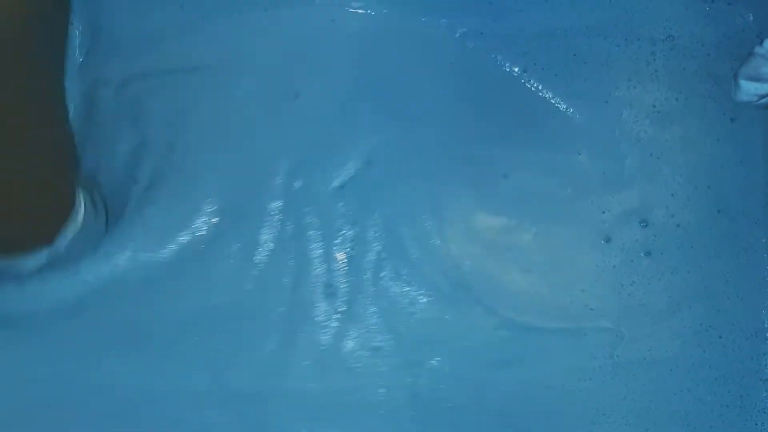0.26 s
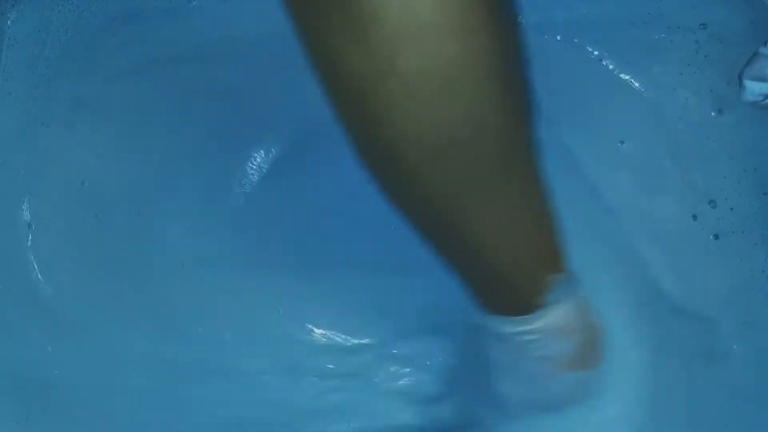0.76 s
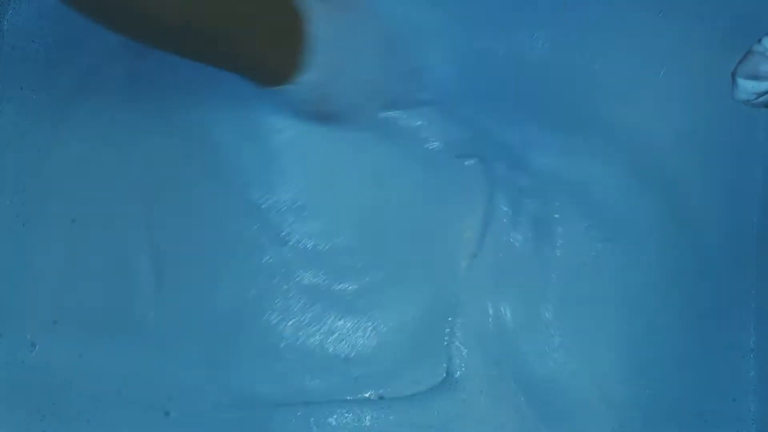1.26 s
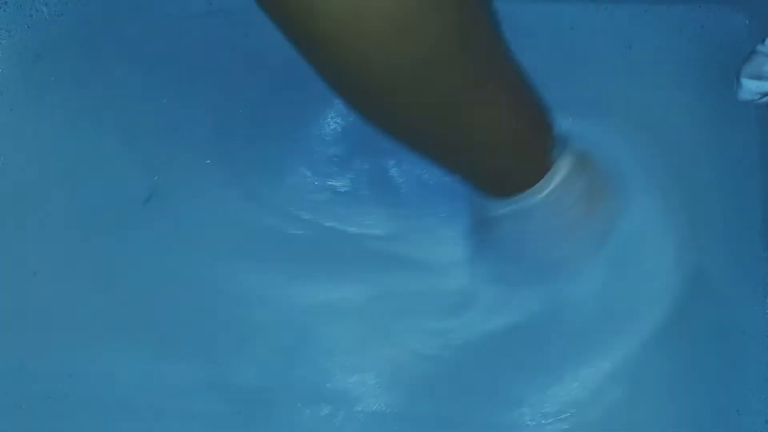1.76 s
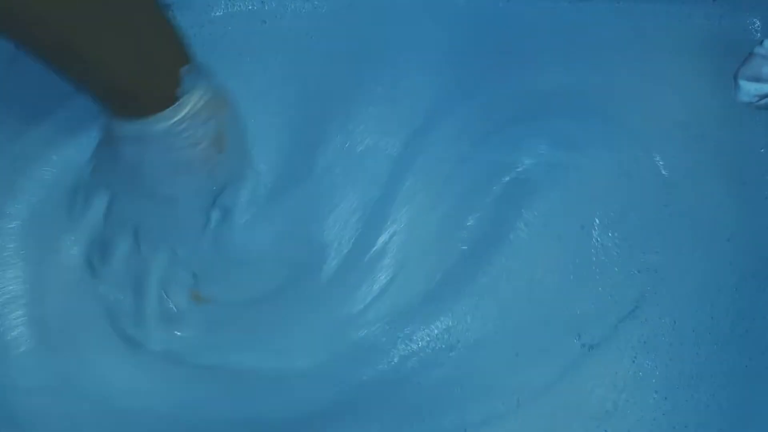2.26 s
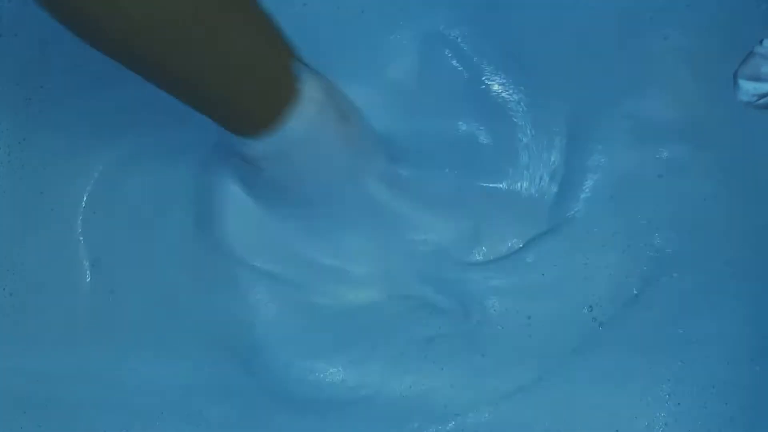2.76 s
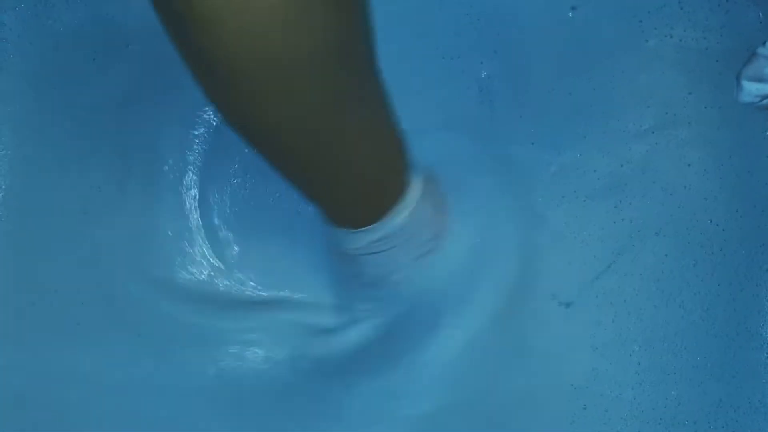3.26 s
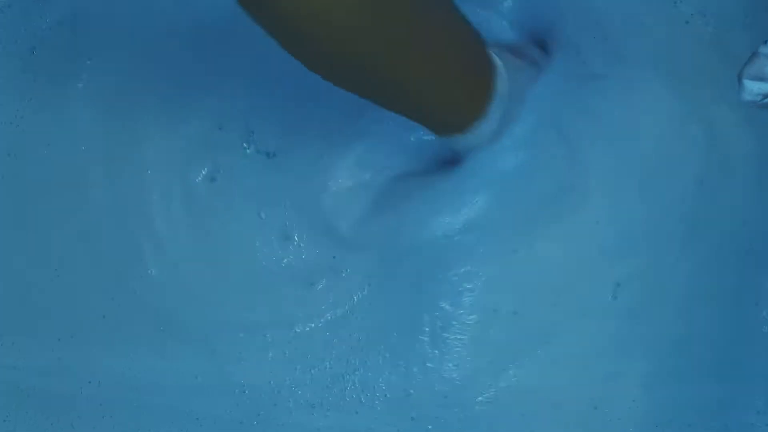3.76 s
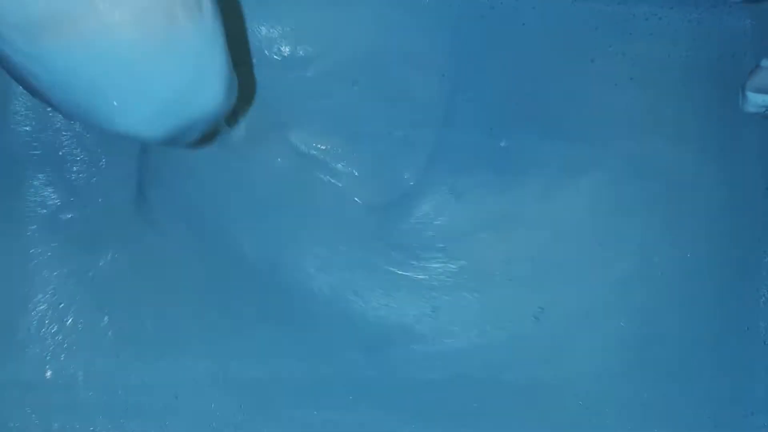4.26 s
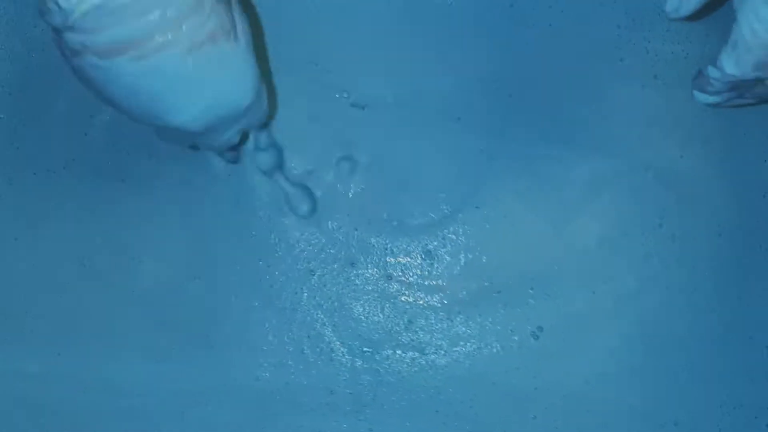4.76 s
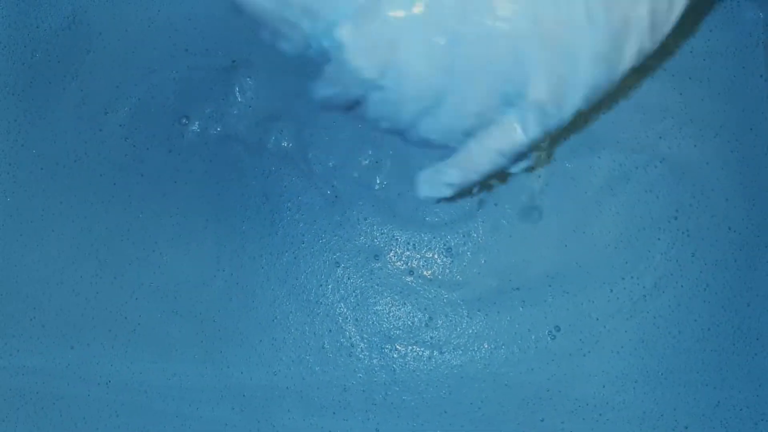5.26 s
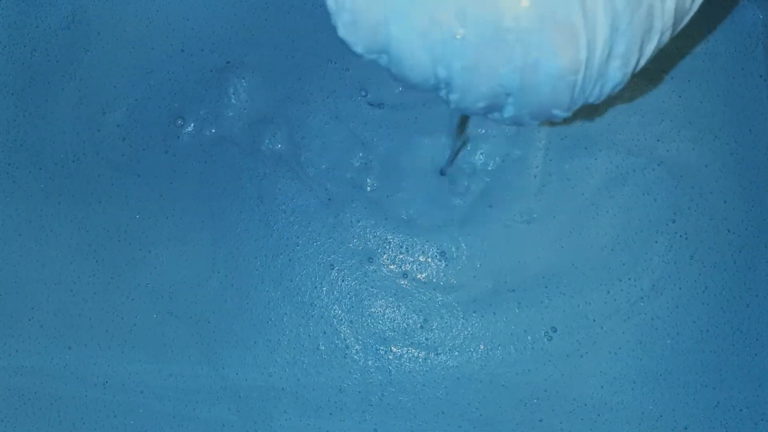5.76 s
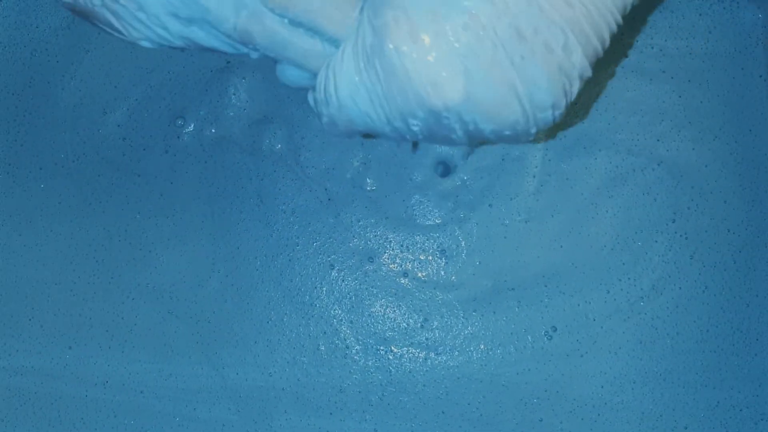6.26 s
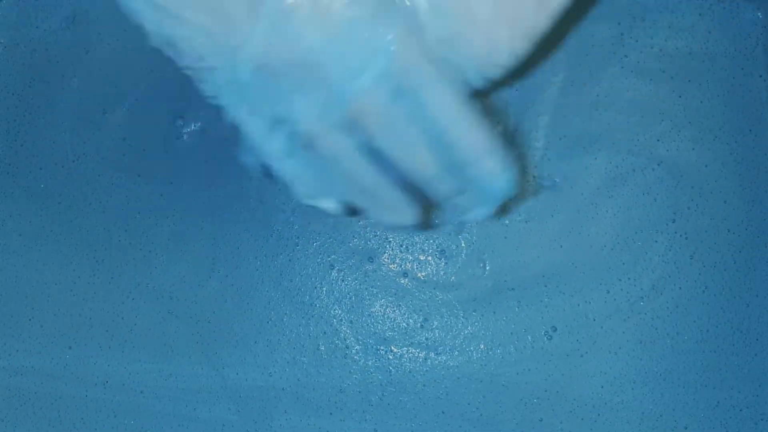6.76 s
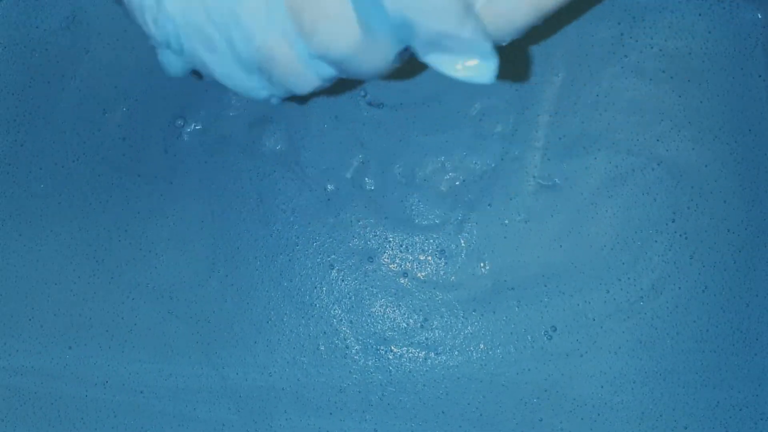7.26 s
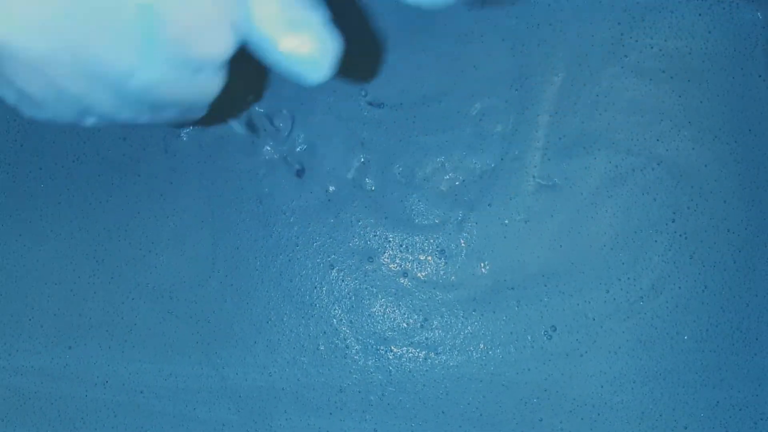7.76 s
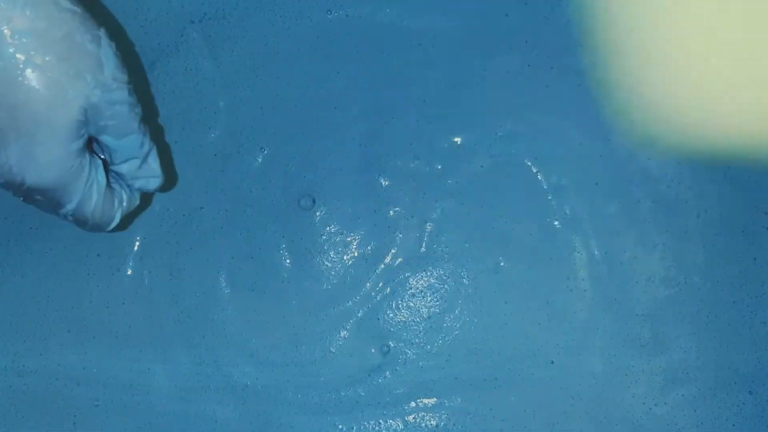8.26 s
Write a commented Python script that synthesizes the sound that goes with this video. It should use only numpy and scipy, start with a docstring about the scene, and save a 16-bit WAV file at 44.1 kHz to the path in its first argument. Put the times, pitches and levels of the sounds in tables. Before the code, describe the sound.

Very close and dry: foam fizzes in uneven strokes, with deep air pockets popping and a loud cluster of plops in the third second. Then wet rubber gloves rub together in bursts of crackly snaps, palm pops, spitting squirts and tiny squeaks. The sounds stop abruptly near eight seconds, leaving faint room hum and one gentle foamy press of a sponge.

```python
"""Foam fizzes at each sweep of a gloved hand through thick soapy paste in a tub, and air pockets plop and
smack. Then two rubber gloves wring and rub the paste with wet snaps and squelches; their sounds break off
abruptly, and after a pause a sponge presses in softly. Foam is filtered random grains and ringing bubbles;
plops and smacks are damped notes whose pitch sinks. Snaps are runs of tiny slips that ring the hollow between
the gloves; squirts and squeaks are bands of noise. One close microphone hears it in a small, quiet room with a
low hum."""
import sys
import numpy as np
from scipy import signal
from scipy.fft import rfft, irfft, next_fast_len
from scipy.io import wavfile

SR = 44100
rng = np.random.default_rng(int(sys.argv[2]) if len(sys.argv) > 2 else 0)


def waveform_to_disk(signal):
    """Save audio, clipped to [-1, 1], as 16-bit WAV at the path in sys.argv[1]."""
    frames = np.transpose(np.atleast_2d(signal))
    scaled = np.clip(frames, -1, 1) * 32767
    samples = np.round(scaled).astype(np.int16)
    wavfile.write(sys.argv[1], SR, samples)


N = 375732  # length in samples

LIFT_S = 4.3  # the stirring hand lifts out of the paste
CUT_S = 8.045  # the glove sounds are cut off abruptly


def from_db(db):
    """Decibels to gain."""
    return 10 ** (np.asarray(db) / 20)


def rms_one(x):
    """Scale to unit power."""
    return x / np.sqrt(np.mean(x ** 2) + 1e-20)


def in_time(rows):
    """Second column of a table, joined by straight lines at every sample."""
    s, values = np.transpose(rows)
    return np.interp(np.arange(N) / SR, s, values)


def add(track, s, sound):
    """Mix a sound in at a time."""
    start = int(np.clip(round(s * SR), 0, N - 1))
    track[start:start + len(sound)] += sound[:N - start]


def colour(x, spectrum):
    """Give a steady sound a spectrum, falling away below its first row; unit power."""
    hz, level_db = np.transpose(spectrum)
    size = next_fast_len(N)
    bins = np.maximum(np.fft.rfftfreq(size, 1 / SR), 1)
    gain = from_db(np.interp(np.log(bins), np.log(hz), level_db))
    gain = gain * np.minimum(bins / hz[0], 1) ** 2
    return rms_one(irfft(rfft(x, size) * gain, size)[:N])


def drift(per_s):
    """A smooth random wander of spread one, with per_s new values each second."""
    knots = rng.standard_normal(8192)
    return rms_one(np.interp(np.arange(N) / SR * per_s, np.arange(len(knots)), knots))


def grains(per_s, spread_db):
    """Tiny clicks at random moments, of random size and sign; unit power."""
    sizes = from_db(spread_db * np.minimum(rng.exponential(1, N), 3.8)) * rng.choice([-1, 1], N)
    return rms_one(sizes * (rng.random(N) < per_s / SR))


def fade(t, t60):
    """Exponential decay, down 60 dB after t60 seconds."""
    return np.exp(-np.log(1000) * t / t60)


def burst(x, level_db):
    """Scale a short sound to a level, its energy counted over 6 ms."""
    return from_db(level_db) * x / np.sqrt(np.sum(x ** 2) / (.006 * SR) + 1e-20)


def evened(x):
    """A run of slips with its energy spread evenly over all pitches."""
    spectrum = rfft(x)
    return irfft(spectrum / (np.abs(spectrum) + 1e-20), len(x))


def resonance(x, hz, width_hz):
    """One damped resonance, of gain one at its top."""
    r, w = np.exp(-np.pi * width_hz / SR), 2 * np.pi * hz / SR
    return signal.lfilter([1, 0, -1], [1, -2 * r * np.cos(w), r * r], x) * (1 - r * r) / 2


def rough_tone_filter(x, width_hz):
    """A one-step smoother: moved up to a pitch, its output is a narrow band of this width."""
    return signal.lfilter([1], [1, -np.exp(-np.pi * width_hz / SR)], x)


def pocket(t, hz, t60, sag, sag_s, rise_s):
    """A damped air cavity of peak one, whose note starts above its middle pitch and sinks below it."""
    pitch = hz * (1 + sag * (np.exp(-t / sag_s) - .5))
    wave = np.sin(2 * np.pi * np.cumsum(pitch) / SR) * fade(t, t60) * (1 - np.exp(-t / rise_s))
    return -wave / np.max(np.abs(wave))


def bubbles(per_s, low_hz, high_hz, cycles, glide):
    """Bubbles open at random, each ringing for a few cycles as its pitch glides; unit power."""
    out = np.zeros(N)
    for when, pitch in rng.random((int(per_s * N / SR), 2)):
        hz = low_hz * (high_hz / low_hz) ** pitch
        age = np.arange(0, 1, hz / (cycles * SR))  # 0 to 1 over the bubble's life
        ring = np.sin(2 * np.pi * cycles * age * (1 + glide * age)) * fade(age, 1)
        add(out, when * N / SR, ring)
    return rms_one(out)


# colour of the room's air noise: pitch_hz, relative level_db (per Hz)
ROOM = [(15, -61), (25, -41), (43, -10.5), (64, -1), (82, -13.5), (123, -14), (161, -15), (285, -20.5),
        (416, -42), (620, -42.5), (1020, -50), (3500, -54), (14800, -45.5), (16000, -56.5)]
# the drone fades away: time_s, level_db
DRONE_LEVEL = [(0, -71.5), (6, -85.5)]


def room(air_db=-61.5, hum_hz=56.1, hum_db=-64, waver_db=2.0, drone_hz=567, drone_width_hz=65):
    """Faint air noise, a wavering low hum and a thin, rough drone."""
    t = np.arange(N) / SR
    hum = np.sqrt(2) * np.sin(2 * np.pi * hum_hz * t + 0.23 * drift(15))
    hum = hum * from_db(hum_db + waver_db * drift(17.0))
    drone = np.sin(2 * np.pi * drone_hz * t + drift(drone_width_hz))
    drone = np.sqrt(2) * drift(2 * drone_width_hz) * drone * from_db(in_time(DRONE_LEVEL))
    return hum + drone + from_db(air_db) * colour(rng.standard_normal(N), ROOM)


def faint_hiss(level_db=-80.5):
    """A very faint, bright hiss."""
    hiss = [(30, -15.5), (500, -3.5), (2500, -15), (6000, 4.0), (16000, 11.5)]  # pitch_hz, relative level_db
    return from_db(level_db) * colour(rng.standard_normal(N), hiss)


def tub(echo_db=-13, t60=0.092, first_s=0.002144, dull_hz=4500):
    """The direct sound and the quick, dull reflections from tub and nearby walls, as a response to a click."""
    t = np.arange(SR // 4) / SR
    echoes = rng.standard_normal(len(t)) * fade(t, t60) * (t > first_s)
    echoes /= np.sqrt(np.sum(echoes ** 2))
    dull = signal.sosfilt(signal.butter(1, dull_hz, fs=SR, output="sos"), echoes)
    return (t == 0) + from_db(echo_db) * dull


def faint_treble(x, level_db):
    """A very faint copy of the treble, shifted by 1 ms."""
    treble = signal.sosfilt(signal.butter(5, 4200, "high", fs=SR, output="sos"), x)
    return from_db(level_db) * np.roll(treble, SR // 1000)


# strokes of the hands, through the paste and then over each other:
# start_s, swell_s, ebb_s, sliding rubber effort_db, crushed foam effort_db
STROKES = [(0, 0.0015, 0.046, -64.5, -73), (0.091, 0.085, 0.054, -65, -59.5), (.42, 0.21, 0.18, -64, -65.5),
           (.66, 0.25, 0.11, -64.5, -61), (0.841, 0.089, 0.62, -69.5, -108), (1.02, 0.13, 0.13, -63, -59),
           (1.288, 0.062, 0.11, -62.5, -56), (1.49, 0.05, 0.29, -75, -64),
           (1.68, 0.041, 0.16, -66.5, -63.5), (1.875, 0.049, 0.21, -64.5, -69.5),
           (1.98, 0.085, 0.32, -67, -60.5), (2.228, 0.081, 0.13, -57, -60.5),
           (2.385, 0.1, 0.051, -60, -49.5), (2.5, 0.056, 0.14, -57, -57), (2.75, 0.06, 0.078, -66.5, -69),
           (2.85, 0.085, 0.15, -57, -58), (3.132, 0.14, 0.13, -67, -62.5), (3.44, 0.083, 0.054, -70.5, -67),
           (3.611, 0.095, 0.021, -63, -55), (3.7, 0.075, 0.13, -65, -59.5), (3.98, 0.042, 0.21, -63.5, -68),
           (4.23, 0.065, 0.092, -71.5, -86), (4.5, 0.04, 0.23, -65, -73), (4.78, 0.048, 0.24, -67, -64.5),
           (5.1, 0.064, 0.099, -58, -58.5), (5.242, 0.065, 0.091, -56, -59.5),
           (5.419, 0.058, 0.18, -58, -67), (5.619, 0.084, 0.16, -60.5, -86),
           (6.01, 0.017, 0.37, -61, -63.5), (6.42, 0.1, 0.024, -43.5, -46.5),
           (6.53, 0.035, 0.21, -63.5, -64), (6.699, 0.018, 0.23, -56.5, -55.5),
           (6.86, 0.095, 0.095, -61, -61.5), (7.101, 0.41, 0.092, -62.5, -60),
           (7.36, 0.13, 0.17, -55.5, -68), (7.6, 0.073, 0.13, -54.5, -59),
           (7.892, 0.076, 0.075, -50.5, -52), (8.38, 0.2, 0.17, -65, -64.5)]


def effort(rest_slide_db=-71, rest_crush_db=-74, after_cut_db=-7.5):
    """Effort of sliding and crushing in dB: strokes swell and ebb over a steady creep, quieter after CUT_S."""
    t = np.arange(N) / SR
    creep = from_db(after_cut_db * (t > CUT_S))
    power = (from_db([[rest_slide_db], [rest_crush_db]]) * creep) ** 2
    for s, swell_s, ebb_s, slide_db, crush_db in STROKES:
        age = np.arange(int((swell_s + ebb_s) * SR)) / SR
        arch = np.sin(np.interp(age, [0, swell_s, swell_s + ebb_s], [0, np.pi / 2, np.pi]))
        add(power[0], s, (from_db(slide_db) * arch) ** 2)
        add(power[1], s, (from_db(crush_db) * arch) ** 2)
    return 10 * np.log10(power)


# lower pitch of the wet gap under the stirring hand: time_s, pitch_hz
GAP_HZ = [(0.3, 1510), (0.42, 1360), (1.13, 1990), (1.6, 1530), (1.65, 1860), (3.1, 1560), (3.11, 1290),
          (3.49, 1940), (4.22, 1450), (4.4, 1890)]


def wander(x, swing=0.11, per_s=11, width_hz=130, ring_db=-8.0, upper_ratio=1.4, upper_db=-3):
    """While the hand is in the paste, the gap under it has two resonances, which move and wobble as it travels."""
    out = x
    for ratio, level_db in ((1, ring_db), (upper_ratio, ring_db + upper_db)):
        hz = ratio * in_time(GAP_HZ) * np.exp(swing * drift(per_s))
        # shift the moving pitch down to zero, smooth there, and shift back up
        turn = np.exp(2j * np.pi * np.cumsum(hz) / SR)
        ring = np.real(turn * rough_tone_filter(x / turn, width_hz))
        out = out + from_db(level_db) * rms_one(ring) * (np.arange(N) / SR < LIFT_S)
    return rms_one(out)


def dulled(x, effort_db, brisk_db=-65, dull_hz=1700):
    """A slow hand tears only the big films, so the treble sinks faster than the rest."""
    dull = signal.sosfiltfilt(signal.butter(3, dull_hz, fs=SR, output="sos"), x)
    return dull + (x - dull) * from_db(np.minimum(effort_db - brisk_db, 0))


# colour of fine wet spray: pitch_hz, relative level_db (per Hz)
SPRAY = [(2000, -18), (4000, 4.5), (6000, 8.5), (8000, 3), (10500, 0), (13000, -2), (14800, 6),
         (16500, -18.5)]


def fine_spray(per_s, spread_db):
    """Tiny droplets: random clicks with a bright colour."""
    return colour(grains(per_s, spread_db), SPRAY)


# colour of bursting foam cells: pitch_hz, relative level_db (per Hz)
FIZZ = [(1500, -3), (3000, -3.5), (5400, 6), (7000, 2), (10000, 0.5), (12500, 0.5), (15500, -3.5),
        (16300, -19.5)]
# colour of tearing wet films: pitch_hz, relative level_db (per Hz)
SHEAR = [(300, -19), (570, 6), (830, -5.5), (1200, -5.5), (2100, -2), (3200, -6.5), (4300, -10),
         (5600, -10), (8000, -26.5), (14000, -36)]


def foam(slide_db, crush_db, fizz_gain_db=-5.0, shear_gain_db=-3.5, fizz_flutter_db=1.6,
         shear_flutter_db=2.26, crackle_db=-7, ticks_db=-10):
    """Moving hands crush foam cells and tear wet films; bigger cells tick, or burst with a brief rising ring."""
    fizz = colour(grains(14000, spread_db=-1.0), FIZZ)
    fizz = fizz * from_db(crush_db + fizz_gain_db + fizz_flutter_db * drift(110))
    shear = wander(colour(grains(1200, spread_db=-3.5), SHEAR))
    shear = shear * from_db(slide_db + shear_gain_db + shear_flutter_db * drift(70))
    crackle = bubbles(per_s=380, low_hz=1105, high_hz=3600, cycles=29, glide=0.11)
    crackle = crackle * from_db(slide_db + crackle_db)
    ticks = fine_spray(120, spread_db=4.0) * from_db((crush_db + slide_db) / 2 + ticks_db)
    return fizz + dulled(shear + crackle, slide_db) + ticks


# colour of small buried pockets: pitch_hz, relative level_db (per Hz)
GURGLE = [(80, -1.5), (140, 5), (280, -2.5), (430, -8), (570, -7), (750, -16), (3000, -51.5)]


def slosh(slide_db, stirred_db=-3, lifted_db=-13, wake_db=-21, wake_t60=0.4, wake_top_db=-31,
          lumps_db=5.5, gloops_db=2):
    """Buried pockets gurgle with the hand, less once it lifts out, and in the wake of each plop and listed snap."""
    t = np.arange(N) / SR
    power = from_db(slide_db + np.where(t < LIFT_S, stirred_db, lifted_db)) ** 2
    wake = fade(t[:SR // 2], wake_t60)
    large_pockets = [row[:2] for row in PLOPS] + [(row[0], row[-1]) for row in SNAPS]
    for s, level_db in large_pockets:
        add(power, s, (from_db(min(level_db, wake_top_db) + wake_db) * wake) ** 2)
    gurgle = colour(grains(300, spread_db=2.0), GURGLE)
    gloops = bubbles(per_s=61, low_hz=126.0, high_hz=322, cycles=11, glide=-0.077)
    wet = rms_one(gurgle + from_db(gloops_db) * gloops)
    return wet * np.sqrt(power) * from_db(lumps_db * drift(28))


# air pockets opening in the paste: start_s, note's peak level_db, middle pitch_hz, 60 dB decay_s
PLOPS = [(0.382, -44.5, 205, 0.1), (0.404, -45, 175, 0.099), (0.458, -43.5, 159, 0.13),
         (0.52, -45, 250, 0.032), (0.599, -49, 219, 0.038), (0.6357, -34.5, 188, 0.033),
         (1.2336, -28.5, 223, 0.026), (1.248, -43, 189, 0.12), (2.41, -44.5, 131, 0.12),
         (2.544, -30, 187, 0.033), (2.6097, -21.5, 265, 0.019), (2.6203, -30, 210, 0.11),
         (2.6554, -18.5, 245, 0.025), (2.672, -32, 262, 0.091), (2.708, -39, 268, 0.059),
         (3.035, -39.5, 188, 0.066), (3.141, -43, 295, 0.01), (3.6014, -34, 274, 0.036),
         (4.0998, -27.5, 201, 0.038), (4.947, -33, 164, 0.03)]
# the hand shoving the paste against the tub: start_s, peak level_db, middle pitch_hz
THUDS = [(0.168, -46.5, 40), (2.603, -34.5, 92), (2.654, -32, 150.7), (3.608, -38.5, 62), (4.04, -39, 57),
         (4.794, -36, 60), (4.948, -42.5, 75), (5.849, -34.5, 64.4), (6.238, -38.5, 68.4)]


def plops(pop_rise_s=0.0022, thud_t60=0.18, slop_ratio=1.48, slop_db=-15):
    """Air pockets open in the paste, which slops round them a little higher; hard shoves thud through the tub."""
    out, t = np.zeros(N), np.arange(SR // 4) / SR
    for s, level_db, hz, t60 in PLOPS:
        note = pocket(t, hz, t60, sag=0.21, sag_s=0.0058, rise_s=pop_rise_s)
        slop = rng.standard_normal(len(t)) * fade(t, t60)
        for _ in range(2):  # twice, for steeper sides
            slop = resonance(slop, hz * slop_ratio, hz)
        add(out, s, from_db(level_db) * (note + from_db(slop_db) * slop / np.max(np.abs(slop))))
    for s, level_db, hz in THUDS:
        add(out, s, from_db(level_db) * pocket(t, hz, thud_t60, sag=0.22, sag_s=0.031, rise_s=0.0055))
    return out


# hollow between the gloves: pitch_hz, width_hz, level_db (before uneven grip)
HOLLOW = [(247, 89, 7.5), (651, 98, 3), (1068, 214, 6.5), (1444, 420, 7), (2190, 550, 5.5),
          (3150, 190, 1.5), (3650, 320, -8), (4380, 390, -6), (5400, 1100, -11.5)]


def hollow(x, stretch, uneven_db=4.0):
    """The well-damped resonances between the gloves, shifted and reweighted as the grip changes."""
    out = 0
    for k, (hz, width_hz, level_db) in enumerate(HOLLOW):
        gain = (-1) ** k * from_db(level_db + uneven_db * rng.standard_normal())
        out = out + gain * resonance(x, hz * stretch, width_hz)
    return out


# skins of paste bursting: start_s, ring's peak level_db, middle pitch_hz,
# spray_db (against the ring, before spray_gain_db)
SMACKS = [(.2502, -38, 890, -22.5), (.636, -36, 720, -21), (.9607, -33, 1940, -16.5),
          (1.698, -49.5, 1880, -30), (1.889, -50.5, 1570, -14), (2.342, -39, 1520, -15),
          (2.4734, -42, 1520, -21), (2.597, -39.5, 2170, -8), (2.765, -55.5, 2180, -22),
          (3.236, -47, 1730, -10), (4.466, -55.5, 1510, -5.5), (2.5298, -33.5, 920, -13),
          (2.5340, -32.5, 1030, -28), (2.6560, -26.5, 810, -12), (2.958, -39.5, 1280, -15),
          (3.068, -41.5, 2190, -36), (3.1408, -31, 620, -33), (4.0997, -25.5, 1000, -25),
          (4.1280, -38.5, 1450, -3.5), (4.2535, -49, 1170, -14), (4.7905, -41, 496, 1),
          (4.8127, -24, 1350, -16), (4.9370, -35.5, 1520, -37), (5.8395, -25, 680, -26)]


def smacks(spray, cycles=3.2, splat_db=-12, splat_t60=0.022, spray_gain_db=-7, spray_t60=0.032,
           splat_width=0.46):
    """A skin bursts with a sharp crack, a few cycles of ring and a broad wet splat around the same pitch."""
    out, t = np.zeros(N), np.arange(2048) / SR
    for k, (s, level_db, hz, spray_db) in enumerate(SMACKS):
        ring = pocket(t, hz, cycles / hz, sag=0.082, sag_s=0.00047, rise_s=.0001)
        tear = evened(rng.standard_normal(len(t)) * fade(t, splat_t60)) * fade(t, 2 * splat_t60)
        splat = burst(resonance(hollow(tear, 0.99, uneven_db=3.5), hz, splat_width * hz), splat_db)
        mist = burst(spray[k * len(t):][:len(t)] * fade(t, spray_t60), spray_db + spray_gain_db)
        add(out, s, from_db(level_db) * (ring + splat + mist))
    return out


# paste squirting out from under the gloves: start_s, length_s, level_db (before swell and sputter),
# treble_db (against the body), gap pitch_hz
SQUIRTS = [(2.315, 0.041, -53.5, -20, 1330), (4.793, 0.021, -38.5, -5, 1310),
           (5.133, 0.024, -48.5, -10, 2460), (6.433, 0.047, -47, -13, 1889),
           (7.365, 0.089, -50.5, -8, 2080), (7.461, 0.043, -45.5, -3.5, 1474),
           (7.484, 0.025, -47.5, -14, 2040), (7.662, 0.065, -48, -13, 1220), (7.921, 0.038, -48, -28, 1810),
           (7.949, 0.097, -55, 2, 2230)]


def squirts(spray, fullness=0.52, sputter_db=3.0, low_cut_hz=520, bypass_db=-3, gap_width_hz=520):
    """Paste forced through a narrow gap swells into a dense crackle, then stops; each gap has its own pitch."""
    t, out = np.arange(N) / SR, np.zeros(N)
    low_cut = signal.butter(4, low_cut_hz, "high", fs=SR, output="sos")
    thin = signal.sosfilt(low_cut, grains(2500, spread_db=3.0))
    ringing = rms_one(hollow(thin, 1.0, uneven_db=0.0))
    body = rms_one(ringing + from_db(bypass_db) * colour(thin, SHEAR))
    body = np.roll(body, SR)  # other grains than those in the gap
    for s, length_s, level_db, treble_db, hz in SQUIRTS:
        gate = np.sin(np.pi * np.clip((t - s) / length_s, 0, 1)) ** fullness
        gap = rms_one(resonance(thin, hz, gap_width_hz))
        out += gate * from_db(level_db) * (rms_one(body + gap) + from_db(treble_db) * spray)
    return out * from_db(sputter_db * drift(250))


# wet rubber squeaking: start_s, length_s, level_db, starting pitch_hz, final pitch_hz
SQUEAKS = [(4.877, 0.11, -65, 1373, 1313), (4.934, 0.012, -57, 2410, 1300), (4.97, 0.14, -73, 2600, 2300),
           (5.788, 0.018, -39.5, 2194, 2460), (6.521, 0.013, -39.5, 4330, 3580),
           (6.522, 0.0078, -38, 13300, 13500), (7.386, 0.059, -55.5, 5310, 6240),
           (7.425, 0.03, -60, 10300, 13100), (7.454, 0.032, -46, 5340, 5360),
           (7.475, 0.051, -58.5, 1317, 1125)]


def squeaks(width_hz=170):
    """A thin wet slit whistles roughly: a narrow, gliding band of noise."""
    out = np.zeros(N)
    for s, length_s, level_db, start_hz, end_hz in SQUEAKS:
        size = int(length_s * SR)
        noise = [1, 1j] @ rng.standard_normal((2, SR // 2))
        unsteady = rough_tone_filter(noise, width_hz)[-size:]
        phase = 2 * np.pi * np.cumsum(np.linspace(start_hz, end_hz, size)) / SR
        whistle = np.real(unsteady * np.exp(1j * phase)) * np.hanning(size)
        add(out, s, from_db(level_db) * rms_one(whistle))
    return out


# the gloves knead hard and crackle with small snaps:
# start_s, length_s, mid-squeeze level_db (before each layer's own gain), snaps_per_s
KNEADS = [(4.533, 0.36, -57, 26.3), (5.1, 0.47, -61, 22.8), (5.636, 0.47, -53.5, 25.4),
          (6.146, 0.43, -56, 39), (7.527, 0.63, -60.5, 29)]


def tackiness(per_s=330, level_db=-8):
    """Under the snaps of each squeeze, tacky paste peels with a soft, dense crackle."""
    t = np.arange(N) / SR
    grip = np.zeros(N)
    for s, length_s, db, _ in KNEADS:
        grip += from_db(db) * np.sin(np.pi * np.clip((t - s) / length_s, 0, 1))
    return grip * from_db(level_db) * rms_one(hollow(grains(per_s, spread_db=5.5), 0.9))


def small_snaps(spread_db=0.5, treble_db=-3.5, pocket_db=4):
    """Kneading sets off small snaps at loosely even gaps, strongest in mid-squeeze; rows like those of SNAPS."""
    rows = []
    for s, length_s, level_db, per_s in KNEADS:
        ages = np.cumsum(rng.gamma(2, .5, size=64)) / per_s
        for age, (size, treble, air) in zip(ages, spread_db * rng.standard_normal((64, 3))):
            if age < length_s:
                db = level_db + size + 4 * (np.sin(np.pi * age / length_s) - 1)
                rows.append((s + age, db, treble_db + treble, db + pocket_db + air))
    return rows


def bounced(x, delay_s, bounce_db=-5):
    """A short sound together with its reflection off the surface of the paste."""
    samples = np.arange(len(x))
    return x + from_db(bounce_db) * np.interp(samples - delay_s * SR, samples, x, left=0)


# wet rubber letting go: start_s, body level_db (before body_db),
# treble_db (against the body, before body_db and spray_db), peak level_db of the air pocket in the palm
SNAPS = [(2.5249, -52.5, 3, -37.5), (2.6544, -37.5, -30, -47), (4.5488, -51, -8, -47),
         (4.575, -58.5, -10, -54), (4.608, -45.5, -7, -64), (4.6142, -46.5, -21, -39.5),
         (4.6394, -49.5, -7, -53.5), (4.653, -56, -1, -42), (4.667, -61.5, -2, -55),
         (4.6786, -39.5, -9, -38), (4.7, -54, -1, -42), (4.734, -55.5, -12, -65), (4.7632, -53, -3.5, -52),
         (4.7849, -43, 6, -32.5), (4.802, -33, -4, -41), (4.8111, -36, -19, -33), (4.825, -43, -10, -31.5),
         (4.8568, -44.5, -7, -43), (5.648, -51, 0, -50), (5.685, -55, 0, -47), (5.711, -46, -7.5, -44),
         (5.752, -48.5, -2.5, -50), (5.76, -54, -7, -52), (5.796, -38.5, -30, -34.5),
         (5.8033, -40.5, -12, -34), (5.822, -49, -5, -38.5), (5.8386, -34, -17, -24),
         (5.851, -50.5, -18, -26.5), (5.9241, -37.5, -27, -29.5), (5.936, -45.5, -18, -37.5),
         (5.9478, -47, -24, -32.5), (5.957, -46.5, -15, -48), (5.9839, -42.5, -4, -35.5),
         (6.0125, -34.5, -12.5, -35.5), (6.0237, -44.5, -18, -35), (6.1586, -50, -6.5, -49),
         (6.2137, -45.5, -3.5, -45), (6.233, -46, -0.5, -39.5), (6.2442, -45, -2, -35),
         (6.2513, -41.5, -12, -28), (6.2698, -46.5, 0, -36), (6.291, -59, 1, -49.5), (6.3073, -51, -7, -43),
         (6.337, -68, -9, -41), (6.3692, -48, -3.5, -38.5), (6.3892, -46.5, -11, -33.5),
         (6.5264, -44, 0.5, -40), (6.6576, -51, -3, -48), (6.7212, -52.5, -3, -43.5),
         (6.955, -54.5, -4.5, -81), (7.211, -61, -6, -87), (7.346, -54, -5.5, -65),
         (7.4155, -45.5, -10, -62), (7.4665, -59.5, 18.5, -74), (7.555, -46, -5.5, -70),
         (7.6147, -52, -2.5, -47), (7.64, -51.5, 3.5, -65), (7.6679, -44.5, -13, -55),
         (7.682, -44.5, -19, -50), (7.712, -54, 8, -43), (7.741, -35, 2, -38.5), (7.781, -44, -1.5, -41),
         (7.803, -46, -9, -31), (7.8277, -48, -6, -38), (7.846, -46.5, -4.5, -46), (7.898, -52, -7, -65),
         (7.921, -45.5, -27, -44), (8.021, -44.5, -1.5, -47)]


def snaps(rows, spray, peel_s=0.0026, body_t60=0.022, spray_t60=0.011, rise_s=0.00035, body_db=1.0,
          spray_db=-1.0, grip_spread=0.027, release=9, bounce_s=0.001355, height_spread=0.062,
          palm_hz=250, palm_spread=0.1, palm_t60=0.05):
    """Rubber peels with a crack and micro-slips that ring the hollow, throw spray and pop the pocket in the palm."""
    out, t = np.zeros(N), np.arange(4096) / SR
    rise, freed = 1 - np.exp(-t / rise_s), np.maximum(t - peel_s, 0)
    for s, level_db, treble_db, pocket_db in rows:
        slips = rng.standard_normal(len(t)) * rng.exponential(1, len(t)) * rise * fade(freed, body_t60)
        slips[int(2 * rise_s * SR)] += release  # the crack
        slips = evened(slips) * rise * fade(freed, 2 * body_t60)
        delay_s = bounce_s * np.exp(height_spread * rng.standard_normal())
        ringing = hollow(slips, np.exp(grip_spread * rng.standard_normal()))
        body = burst(bounced(ringing, delay_s), level_db + body_db)
        mist = spray[rng.integers(N - len(t)):][:len(t)] * rise * fade(freed, spray_t60)
        mist = burst(bounced(mist, delay_s), level_db + treble_db + spray_db)
        hz = palm_hz * np.exp(palm_spread * rng.standard_normal())  # varies with the grip
        palm = pocket(t, hz, palm_t60, sag=0.11, sag_s=0.00278, rise_s=0.00013)
        add(out, s, body + mist + from_db(pocket_db) * palm)
    return out


def scene():
    """Everything sits in the centre, plus very faint treble and hiss, opposite in left and right."""
    slide_db, crush_db = effort()
    spray = fine_spray(15000, spread_db=1.5)
    fizz = foam(slide_db, crush_db)
    bed = room() + fizz + slosh(slide_db)
    paste = plops() + smacks(spray)
    gloves = squirts(spray) + squeaks() + tackiness() + snaps(SNAPS + small_snaps(), spray)
    gloves = gloves * (np.arange(N) / SR < CUT_S)
    centre = signal.fftconvolve(gloves + paste, tub())[:N] + bed
    opposite = faint_treble(gloves, level_db=-53.0) + faint_treble(fizz, level_db=-66.0) + faint_hiss()
    return np.array([centre + opposite, centre - opposite])


def record(dry, cutoff_hz=16400):
    """The top is cut steeply."""
    return signal.sosfilt(signal.ellip(10, .2, 70, cutoff_hz, fs=SR, output="sos"), dry)


dry = scene()
out = record(dry)
waveform_to_disk(out)
```